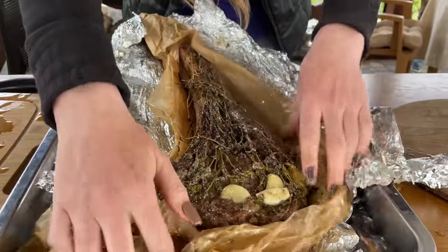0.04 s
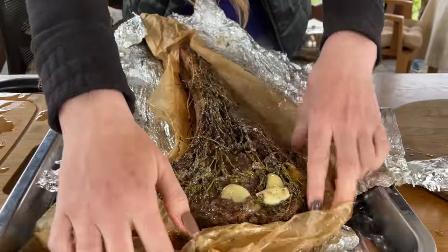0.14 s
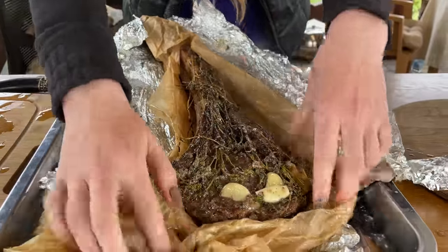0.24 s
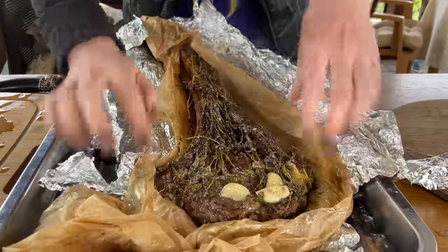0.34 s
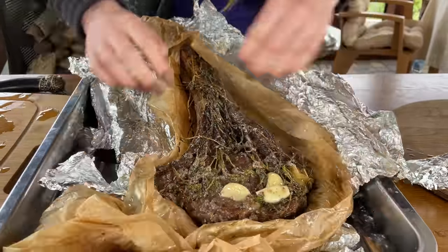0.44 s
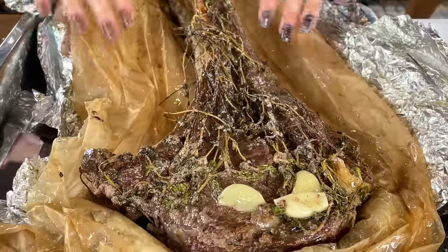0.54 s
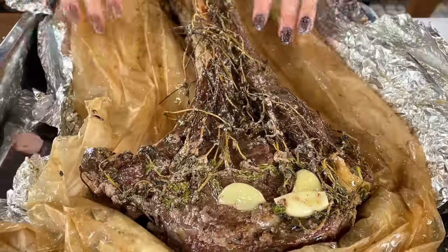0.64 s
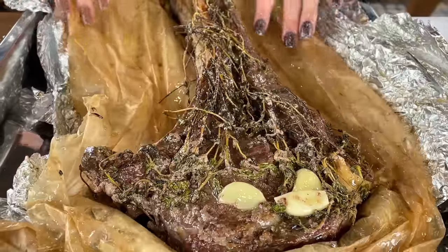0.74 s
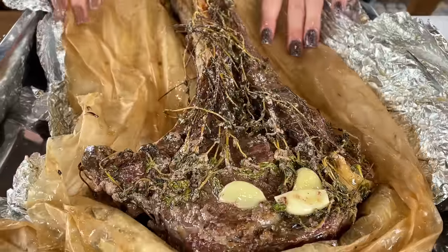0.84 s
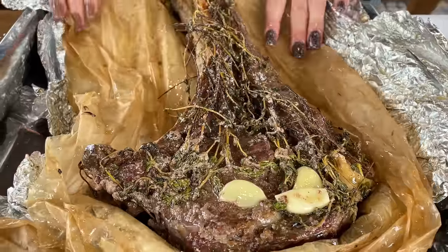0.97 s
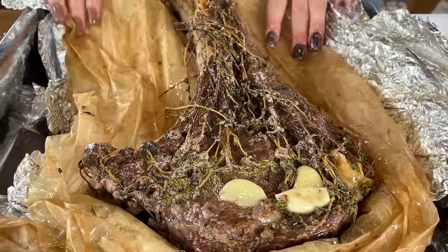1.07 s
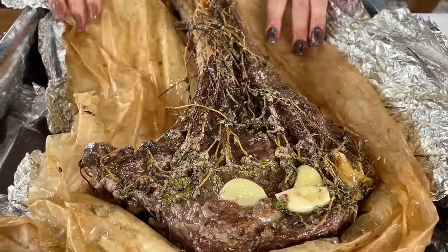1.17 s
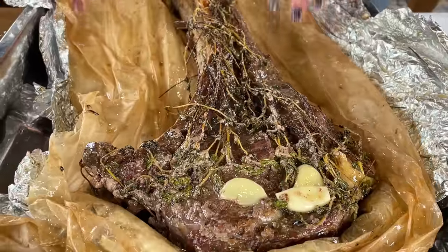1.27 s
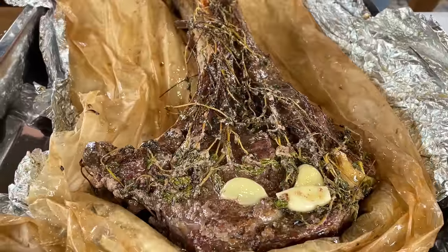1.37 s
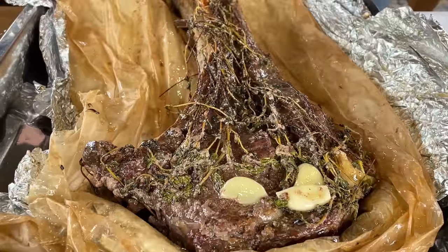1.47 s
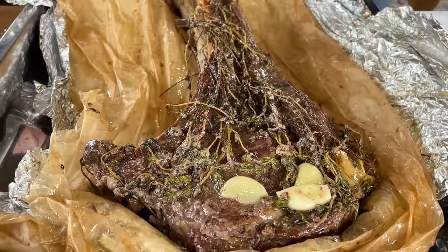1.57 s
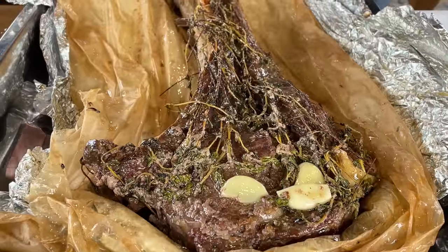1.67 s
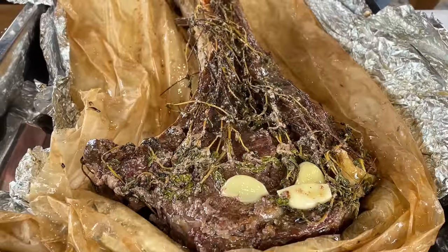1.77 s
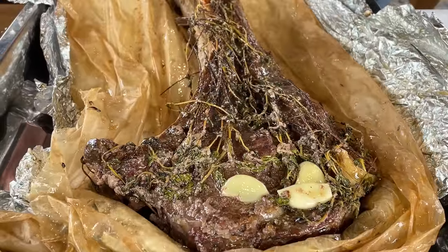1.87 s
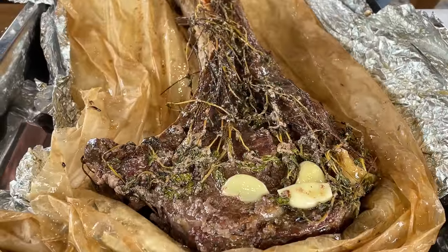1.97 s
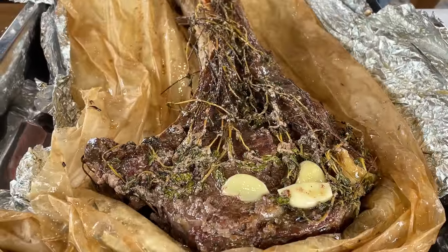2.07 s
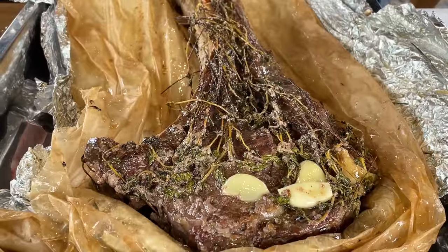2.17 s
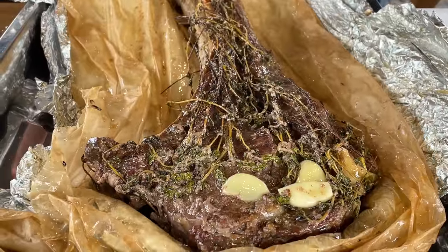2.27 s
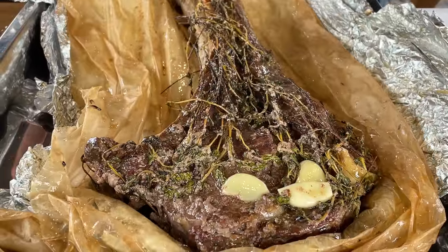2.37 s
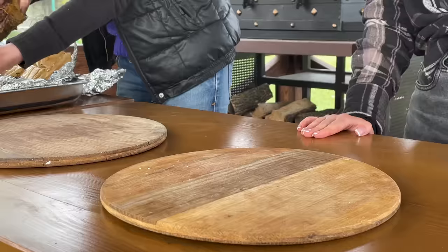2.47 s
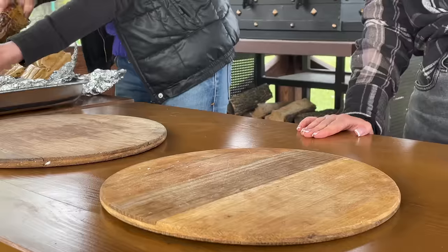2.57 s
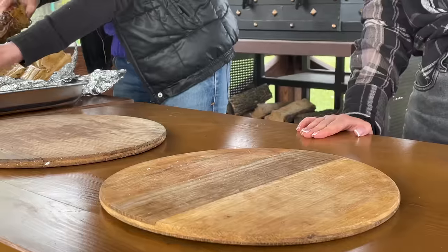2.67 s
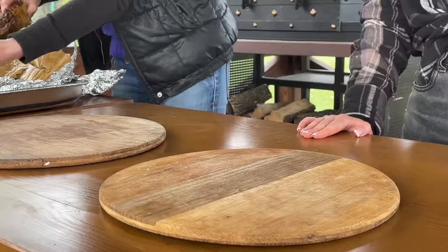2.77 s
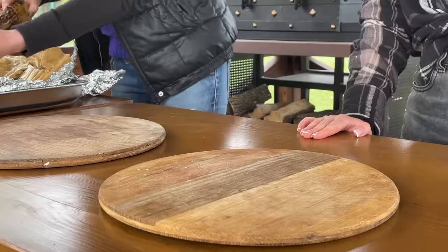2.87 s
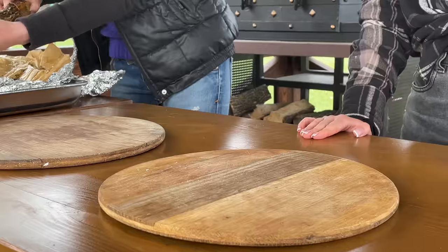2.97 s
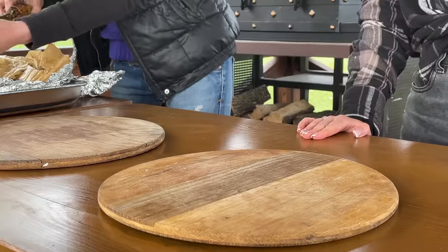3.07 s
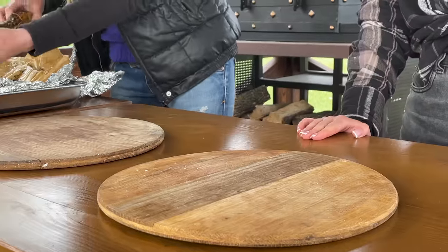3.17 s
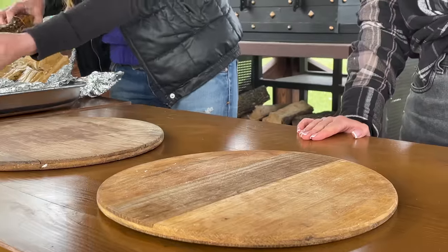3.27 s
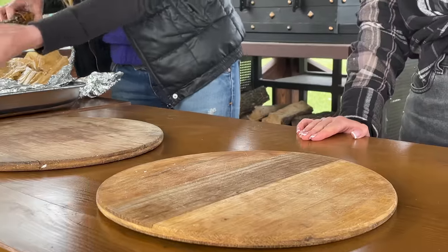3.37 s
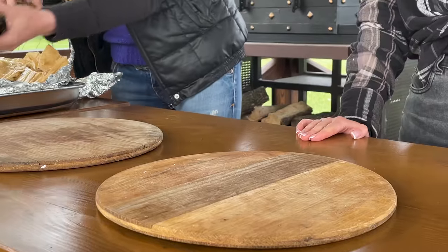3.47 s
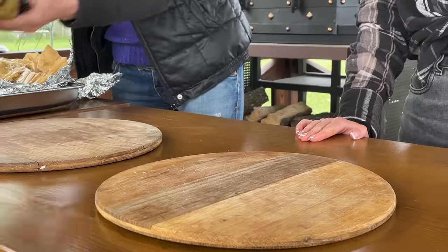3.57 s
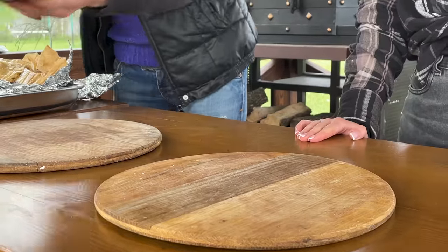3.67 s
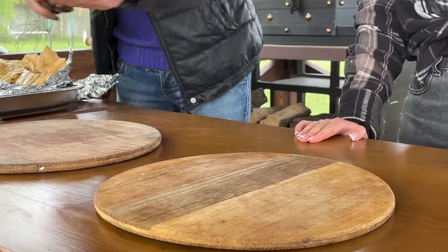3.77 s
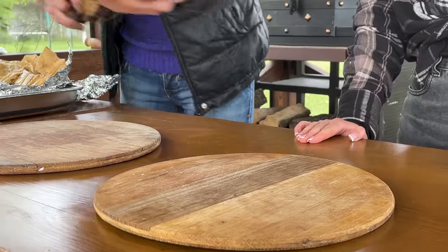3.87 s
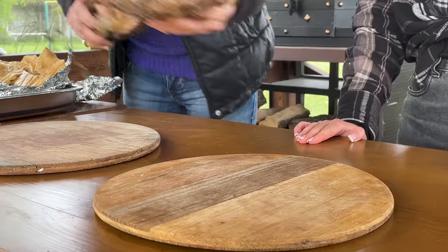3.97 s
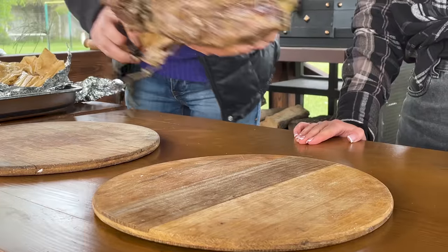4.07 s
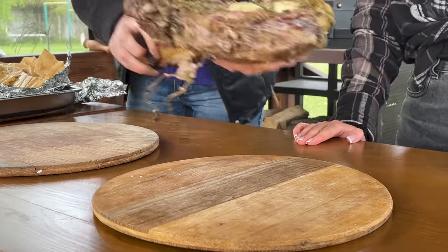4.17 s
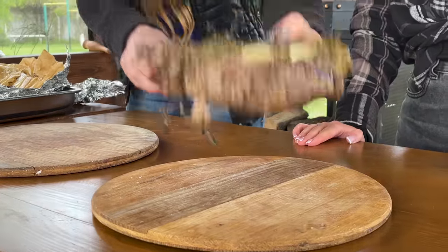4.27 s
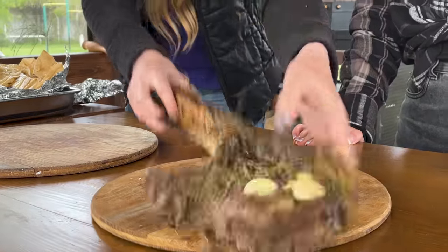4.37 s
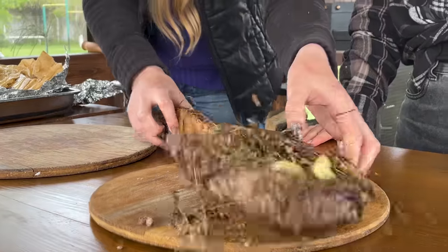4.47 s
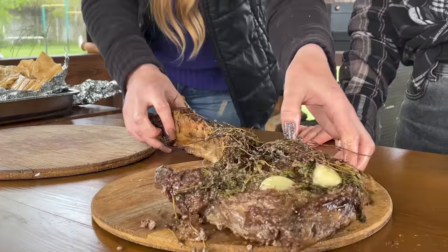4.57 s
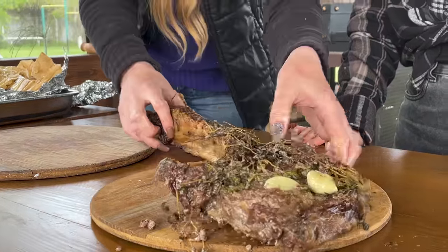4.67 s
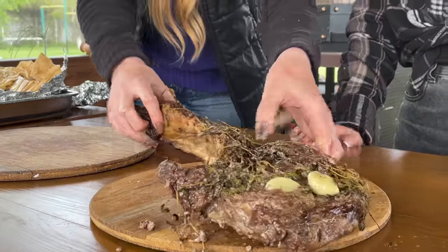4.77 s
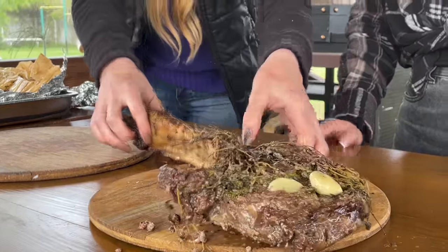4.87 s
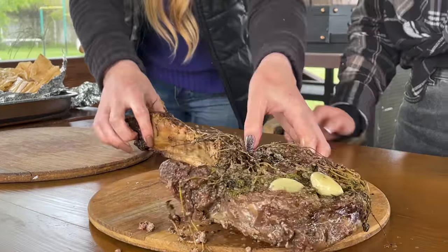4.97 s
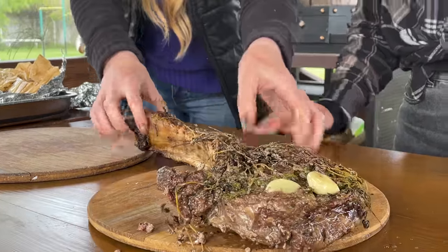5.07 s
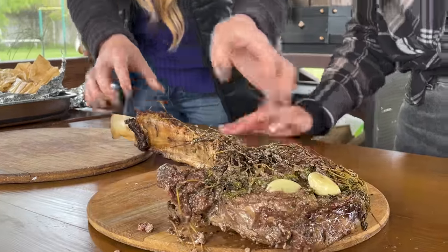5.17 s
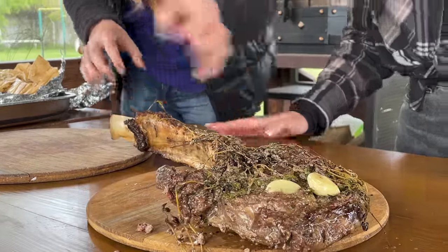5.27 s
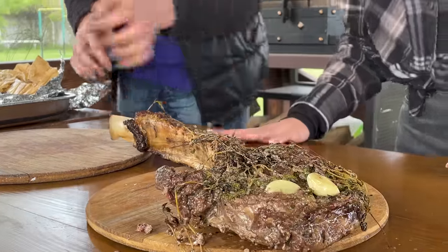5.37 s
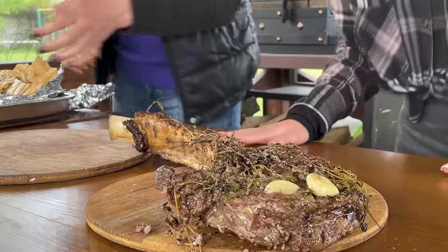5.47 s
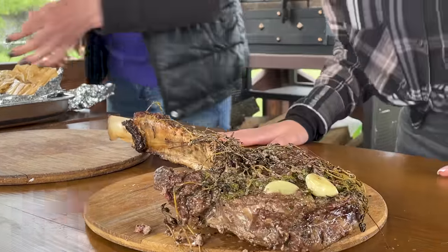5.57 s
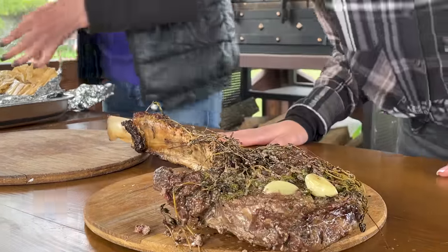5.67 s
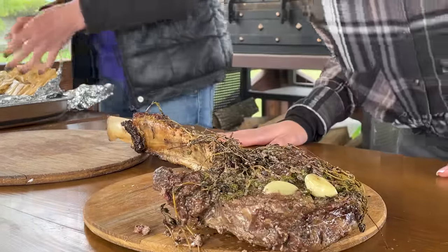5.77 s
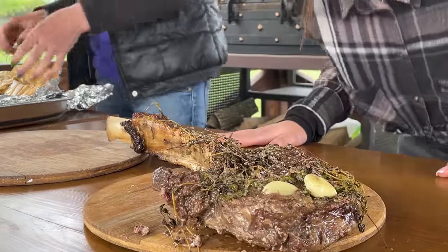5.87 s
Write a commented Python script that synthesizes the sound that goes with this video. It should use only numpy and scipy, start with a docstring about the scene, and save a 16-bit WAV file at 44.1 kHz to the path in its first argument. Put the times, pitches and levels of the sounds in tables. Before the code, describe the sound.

Crisp foil and greased paper crinkling up close, a quieter pause, a short tray scrape, then heavy meat landing bone first on wood.

```python
"""Over low rumble and hiss (filtered noise), hands pull foil and baking paper off a roast: random creases ring facets.
Fingers pat and slide (noise); a far whine (sagging sine) comes and goes; farther off foil stirs and knocks,
the sound blinks out once, and the roasting tray judders on the table (stick-slip driving damped modes).
The joint is carried over, dripping and shedding crumbs (ticks), lands bone first on a wooden board and is let
go with a thud (noise bursts, ringing modes); then sleeves rustle (noise). A small live room answers (noise tail)."""
import sys
import numpy as np
from scipy import signal
from scipy.fft import rfft, irfft
from scipy.io import wavfile
from scipy.ndimage import uniform_filter1d

SR = 44100
rng = np.random.default_rng(int(sys.argv[2]) if len(sys.argv) > 2 else 0)


def bounce(signal):
    """Save signal as a 16-bit WAV file at the path given by the first command-line argument."""
    frames = np.transpose(np.atleast_2d(signal))
    limited = np.clip(frames, -1, 1)
    pcm = np.round(limited * 32767).astype(np.int16)
    wavfile.write(sys.argv[1], SR, pcm)


N = 261513
TIME = np.arange(N) / SR   # s

# Rumble level. Each row: time in seconds, level in dB before RUMBLE_GAIN_DB.
RUMBLE_LEVEL = [(0.0, -64), (1.3, -61.5), (1.7, -63.5), (3.9, -60), (4.21, -68.5), (5.1, -58),
                (5.25, -60.5), (5.93, -62)]
# Background noise spectrum. Each row: frequency in Hz, relative level in dB.
AIR_SPECTRUM = [(12, -35.5), (20, 6), (40, -6.5), (70, -12), (104, -17.5), (130, -23.5), (154, -20.5),
                (182, -18), (457, -36), (755, -40.5), (868, -42.5), (2060, -46), (2730, -46.5), (3410, -50),
                (15800, -55)]
RUMBLE_GAIN_DB, HISS_DB = 4.5, -71.5

# Pulls on the wrapping: it swells as the sheets tighten, then lets go. Each row: start in seconds,
# length in seconds, swell in dB, 60 dB release in seconds, foil level in dB, paper level in dB.
PULLS = [(-.02, 0.37, -2, 0.055, -57, -55), (0.317, .075, 8, 0.046, -55.5, -56.5),
         (0.773, .19, 12, 0.41, -55.5, -53.5), (1.066, 0.079, 10.5, 0.19, -57.5, -53.5),
         (1.246, 0.1, 9.5, 0.24, -55.5, -58.5)]
# Foil spectrum. Each row: frequency in Hz, relative level in dB.
FOIL_SPECTRUM = [(700, -31), (1600, 3), (2400, 6.5), (2900, -0.5), (4500, 6), (6500, 3.5), (7500, 0.5),
                 (10000, 2.5), (12500, -4.5), (14500, -26), (16000, -17)]
# Baking paper spectrum. Each row: frequency in Hz, relative level in dB.
PAPER_SPECTRUM = [(80, -11), (150, -3), (380, -1), (580, 0.5), (1000, 3), (1700, -6), (2800, -3),
                  (6000, -7)]
SETTLE_DB, SETTLE_S = -14.5, 1   # let go, the sheets creak on faintly
ATTACK_S = 0.007   # a movement sets in this fast
FOIL_RUB = 0.45   # sheet friction relative to crease snaps
CATCH_DB, CATCHES_PER_S = 1.3, 60   # folds catch and give: rms wander of the crackle, and its rate
# Small snaps: peak above the foil level, spread either way (0 = all alike), middle pitch.
STRAY_SNAPS_PER_S, STRAY_SNAP_DB, STRAY_SPREAD_DB, STRAY_HZ = 46, 16, 0, 7040
# Fingers patting the wrapping. Each row: time in seconds, peak in dB, softness low-pass in Hz.
PATS = [(0.081, -41, 537), (0.331, -34, 1880), (.337, -35.5, 2050)]
# Loudest crease snaps. Each row: time in seconds, peak in dB, centre in Hz.
LOUD_SNAPS = [(.1456, -30, 9100), (.1699, -32, 9000), (.2044, -32, 6000), (.2209, -32.5, 3000),
              (.2779, -30.5, 4430), (.3090, -25, 3830), (.5449, -47.5, 5860), (.7676, -43.5, 5010),
              (.7983, -40, 4540), (.8395, -38.5, 8000), (.8937, -29.5, 4300), (.9543, -36, 5000),
              (.9709, -27.5, 8500), (1.0851, -34.5, 4470), (1.1082, -37, 9000), (1.1335, -29, 3360),
              (1.2731, -39, 6660), (1.3341, -31, 8000)]
# Slides of fingers, wrapping and sleeves. Each row: middle in seconds, half length in seconds,
# level in dB before a 6 dB cut, centre in Hz, width in octaves.
SLIDES = [(0.359, 0.043, -40.5, 9900, 2.2), (0.943, 0.018, -44.5, 5130, 1.7),
          (0.986, 0.041, -49, 8800, 0.57), (1.136, 0.0072, -43.5, 4000, 7.1),
          (1.352, 0.024, -39, 7170, 0.73), (1.59, 0.056, -64.5, 1690, 2), (2.576, 0.051, -57.5, 680, 0.98),
          (3.506, 0.03, -55, 6900, 1.1), (4.052, 0.054, -65, 6400, 3.8), (5.205, 0.028, -62, 4220, 0.38),
          (5.268, 0.03, -57, 4070, 0.81), (5.49, 0.017, -54.5, 4530, 1.7), (5.52, 0.056, -64, 1440, 2.2),
          (5.84, 0.042, -62.5, 4280, 2.5)]

# Far whine. Each row: loudest time in seconds, half length in seconds, pitch there in Hz, level in dB.
WHINES = [(2.95, 0.53, 480, -75), (3.68, 0.27, 464, -81.5), (5.6, .14, 460, -79)]
SAG_HZ_PER_S = 43

# Far foil stirring. Each row: start in seconds, length in seconds, swell in dB,
# 60 dB release in seconds, level in dB.
FOIL_STIRS = [(2.53, .04, 9, 0.34, -66.5), (2.607, 0.11, -0.5, 0.28, -62.5), (2.773, .02, -4, .17, -58),
              (3.49, .03, 6, .4, -67)]
# Far foil spectrum. Each row: frequency in Hz, relative level in dB.
FAR_FOIL_SPECTRUM = [(180, -35), (300, -15.5), (474, -12), (763, -13), (913, -7), (1620, -11.5), (2100, -3),
                     (3860, -19), (4120, -13), (8320, -15), (10800, -17.5), (15000, -21)]
# Wrapping knocking in the tray. Each row: time in seconds, peak in dB, centre in Hz.
CLACKS = [(2.564, -52, 900), (2.6185, -43.5, 2030), (2.6276, -47, 2350), (2.692, -47, 3580),
          (2.7828, -40.5, 2080), (2.792, -55, 2100)]
# Blink of silence: from seconds, to seconds.
SILENCE_S = (2.503, 2.521)
# Juice drops and herb crumbs landing. Each row: time in seconds, peak in dB, centre in Hz.
DRIPS = [(3.212, -53.5, 9000), (4.154, -52, 10200), (4.1862, -39, 7000), (4.2048, -54, 7150),
         (4.3159, -52.5, 5000), (4.3281, -47, 5240), (4.346, -56, 4000), (4.6274, -51, 9100),
         (4.9714, -49, 2150), (4.985, -46, 5970), (5.494, -44, 3740)]

# Tray modes. Each row: frequency in Hz, relative level in dB, 60 dB decay in seconds.
TRAY_MODES = [(167, -1, 0.16), (228, -17, 0.24), (339, 8, 0.03), (376, -12.5, 0.11), (396, -7, 0.14),
              (436, -6, 0.09), (623, 2.5, 0.057), (678, 4.5, 0.12), (710, 5.5, 0.05), (963, -4, 0.27),
              (1040, -5, 0.071), (1088, -2, 0.093), (1160, -1.5, 0.15), (1560, 2.5, 0.014),
              (1720, -17, 0.15), (1725, -17, 0.18), (1880, -16, .06), (2430, -13.5, 0.043),
              (3000, -18, .025), (3520, -42, .03), (4570, -9.5, 0.026), (5000, -10, 0.017),
              (5860, -25, .015), (9150, -16, 0.024)]
# Dull bumps as the tray breaks loose and stops. Each row: time in seconds, peak in dB, upper cut in Hz.
SHOVES = [(3.3233, -47, 400), (3.342, -32, 415), (3.432, -41.5, 400)]
JUDDER_START_S, JUDDER_S = 3.332, 0.105   # until the foot holds again
FIRST_SLIPS_PER_S, TOP_SLIPS_PER_S, SPEED_UP_S = 130, 240, 0.016   # speed-up time constant
# Drive levels, before the tray and table gains.
PUSH_DB, PUSH_S, PUSH_RELEASE_S = -35, 0.032, 0.12   # dull push of the first slips
RASP_DB, RASP_S, RASP_SWELL_DB, RASP_RELEASE_S = -39.5, 0.033, 14, 0.36   # sharp edge of the slips

# Herb crumbs trickling off the carried joint; level and pitch are midpoints.
CRUMBS_START_S, CRUMBS_S, CRUMBS_PER_S, CRUMB_DB, CRUMB_HZ = 4.03, 0.44, 38, -58, 8000

# Bone meeting the board. Each row: time in seconds, then drive levels before fixed gains: wood in dB, contact
# low-pass in Hz, grit in dB, sharp crack in dB, board ring in dB, table ring in dB.
BONE_KNOCKS = [(4.4790, -25, 9000, -16, -18, -59, -48), (4.4834, -22.5, 8000, -16, -3, -59, -31),
               (4.4956, -20, 5000, -32.5, -23.5, -62, -44.5), (4.523, -22, 3500, -46, -27, -58, -55),
               (4.5390, -26.5, 2200, -53.5, -36, -42, -39)]
# Meat settling on the board. Each row: time in seconds, slap in dB before a fixed gain,
# softness low-pass in Hz, board ring drive in dB, table ring drive in dB.
MEAT_THUDS = [(4.984, -34, 2500, -56, -46), (4.9951, -15.5, 4500, -36.5, -45),
              (5.0310, -28.5, 1820, -37, -38)]
# Crowded short wood modes, as a spectrum. Each row: frequency in Hz, relative level in dB.
WOOD_SPECTRUM = [(60, -17), (200, -3.5), (300, -10), (400, -7), (530, -9), (750, -6), (930, -12),
                 (1140, -9), (1350, -14.5), (1720, -6), (2080, -11), (2500, -18), (3200, -21.5),
                 (3800, -17), (5200, -15.5), (15000, -40)]
# Bone crack spectrum. Each row: frequency in Hz, relative level in dB.
CRACK_SPECTRUM = [(400, -21), (900, -17), (1750, -5.5), (2500, -8.5), (3000, 0.5), (3300, 3.5), (3650, -2),
                  (4100, -4.5), (5800, -4), (7000, -9.5), (8700, -8.5), (13000, -15), (16000, -26)]
# Flesh slap spectrum. Each row: frequency in Hz, relative level in dB.
SLAP_SPECTRUM = [(70, -25.5), (200, -1), (450, -0.5), (650, 2.5), (1150, -1), (1480, -0.5), (1650, -12.5),
                 (2050, -8), (2600, -15), (3500, -19.5), (6000, -26), (12000, -22.5)]
# Bone modes. Each row: frequency in Hz, relative level in dB, 60 dB decay in seconds.
BONE_MODES = [(1570, -7, .06), (2087, -2, 0.041), (3180, -8, .07), (5700, -9.5, .012)]
# Round board modes. Each row: frequency in Hz, relative level in dB, 60 dB decay in seconds.
BOARD_MODES = [(236.6, 8.5, 0.21), (266.4, -5.5, 0.27), (374, -11, 0.16), (400, -8, 0.15),
               (502, -11.5, .15), (612, -17, 0.23), (714, -9, 0.2), (781, -12.5, 0.16), (1158, -14, 0.25),
               (1260, -17, 0.21), (1385, -18, 0.2), (1700, -25, 0.22), (1770, -18, 0.17), (1935, -17, 0.15)]
# Modes of the table under it. Each row: frequency in Hz, relative level in dB, 60 dB decay in seconds.
TABLE_MODES = [(69.2, -3.5, 0.12), (100, -21.5, .25), (114.8, -9, 0.41), (131.9, -4, 0.28),
               (173.1, -5, 0.47)]
CLOTHES_START_S, CLOTHES_DB = 4.98, -74.5

# Room decay. Each row: frequency in Hz, 60 dB decay in seconds.
ROOM_DECAY = [(200, 0.47), (500, 0.38), (1000, 0.46), (2500, 0.45), (6000, 0.24), (14000, 0.18)]
CUTOFF_HZ = 15650


def from_db(db):
    """Amplitude ratio of a level in dB."""
    return 10 ** (np.asarray(db) / 20)


def rms_one(x):
    """Scale to rms 1."""
    return x / np.sqrt(np.mean(x ** 2) + 1e-20)


def peak_one(x):
    """Scale to peak 1."""
    return x / np.max(np.abs(x))


def at_hz(points, hz):
    """Read a curve over log frequency."""
    point_hz, value = np.array(points)[:, :2].T
    return np.interp(np.log(hz + 1), np.log(point_hz), value)


def cut(x, hz, kind, order=2):
    """Butterworth low-, high- or band-pass."""
    sos = signal.butter(order, np.clip(hz, 10, 0.45 * SR), kind, fs=SR, output="sos")
    return signal.sosfilt(sos, x + 1e-18)


def colour(x, spectrum, size=8192):
    """Causal (minimum-phase) filter of unit energy with the given spectrum."""
    bins_hz = np.arange(size // 2 + 1) * SR / size
    cepstrum = irfft(np.log(from_db(at_hz(spectrum, bins_hz))))
    cepstrum[1:size // 2] *= 2   # fold onto positive time
    cepstrum[size // 2 + 1:] = 0
    response = irfft(np.exp(rfft(cepstrum)))
    return signal.fftconvolve(x, response / np.linalg.norm(response))[:len(x)]


def drift(knots_per_s):
    """Random wander of rms 1, linear between random knots."""
    knots = rng.standard_normal(4096)
    return rms_one(np.interp(TIME * knots_per_s, np.arange(len(knots)), knots))


def ring(force, modes):
    """Parallel damped modes driven by a force, signs alternating."""
    out = 0
    for k, (hz, db, t60_s) in enumerate(modes):
        r = from_db(-60 / (t60_s * SR))
        w = 2 * np.pi * hz / SR
        mode = signal.lfilter([0, np.sin(w)], [1, -2 * r * np.cos(w), r * r], force + 1e-18)
        out = out + (-1) ** k * from_db(db) * mode
    return out


def burst(t60_s, size=32768):
    """Noise that starts at once and dies away exponentially."""
    return rng.standard_normal(size) * np.exp(-np.log(1000) * np.arange(size) / SR / t60_s)


def add(track, start_s, sound):
    """Mix a sound into a track at a time."""
    at = max(round(start_s * SR), 0)
    track[at:at + len(sound)] += sound[:N - at]


def stroke(start_s, length_s, swell_db, release_s):
    """Envelope of one movement: quick attack, swell up to 1 at its end, then release at 60 dB per release_s."""
    age = TIME - start_s
    to_go = np.clip(1 - age / length_s, 0, 1)
    released = np.clip((age - length_s) / release_s, 0, 3)
    return np.clip(age / ATTACK_S, 0, 1) * from_db(-swell_db * to_go) * 0.001 ** released


def swell(middle_s, half_length_s):
    """Bell-shaped rise and fall around a time."""
    return np.exp(-2 * ((TIME - middle_s) / half_length_s) ** 2)


def ticks(rows, t60_s, flutter_db, width):
    """Each tick is a sharp click and a brief noise flutter, band-passed around its own pitch."""
    out = np.zeros(N)
    for s, db, hz in rows:
        click = from_db(flutter_db) * burst(t60_s, size=4096)
        click[0] = 1
        band = cut(click, [hz / (1 + width), hz * (1 + width)], "band", order=1)
        add(out, s, from_db(db) * peak_one(band))
    return out


def crinkle(per_s, spread_db, cycles, rub, facets=20):
    """Tiny creases buckle at random, each ringing a facet of its own size, over the hiss of sheets rubbing; rms 1."""
    sizes = from_db(spread_db * np.minimum(rng.exponential(1, N), 4)) * rng.choice([-1, 1], N)
    clicks = sizes * (rng.random(N) < per_s * from_db(3 * drift(120)) / SR)
    facet = rng.integers(0, facets, N)
    snaps = 0
    for k, hz in enumerate(np.geomspace(400, 15000, facets)):
        strain = from_db(3.06 * drift(35))   # the fold wanders from facet to facet
        snaps = snaps + hz * ring(clicks * (facet == k) * strain, [(hz, 0, cycles / hz)])
    return rms_one(rms_one(snaps) + rub * rng.standard_normal(N))


def rumble_and_hiss():
    """One shaped noise, split into a low rumble of varying level and a steady soft hiss."""
    level_s, level_db = np.transpose(RUMBLE_LEVEL)
    rumble_db = np.interp(TIME, level_s, level_db) + RUMBLE_GAIN_DB
    air = colour(rng.standard_normal(N + SR), AIR_SPECTRUM)[SR:]   # skip the filter's onset
    rumble = from_db(rumble_db) * rms_one(cut(air, 219, "low"))
    hiss = from_db(HISS_DB) * rms_one(cut(air, 397, "high"))
    return rumble + hiss


def wrapping():
    """Creases crackle brightly in the foil and rustle in the baking paper under it, as hard as each is pulled."""
    foil_level = paper_level = np.zeros(N)
    for start_s, length_s, swell_db, release_s, foil_db, paper_db in PULLS:
        pull = stroke(start_s, length_s, swell_db, release_s)
        settling = from_db(SETTLE_DB) * stroke(start_s, length_s, swell_db, SETTLE_S)
        effort = np.maximum(pull, settling)
        foil_level = np.maximum(foil_level, from_db(foil_db) * effort)
        paper_level = np.maximum(paper_level, from_db(paper_db) * effort)
    catches = from_db(CATCH_DB * drift(CATCHES_PER_S))   # gathers the crackle in clusters
    foil = rms_one(colour(crinkle(per_s=3000, spread_db=0.5, cycles=7.1, rub=FOIL_RUB), FOIL_SPECTRUM))
    paper = rms_one(colour(crinkle(per_s=2200, spread_db=2.5, cycles=5, rub=0.4), PAPER_SPECTRUM))
    return foil_level * catches * foil + paper_level * paper + stray_snaps(foil_level)


def stray_snaps(foil_level):
    """Small snaps come at random over an octave, as strong as the foil is being worked."""
    rows = []
    for at, size, pitch in rng.random((int(STRAY_SNAPS_PER_S * N / SR), 3)):
        foil_db = 20 * np.log10(foil_level[int(at * N)] + 1e-9)
        peak_db = foil_db + STRAY_SNAP_DB + STRAY_SPREAD_DB * (2 * size - 1)
        rows.append((at * N / SR, peak_db, STRAY_HZ * 2 ** (pitch - 0.5)))
    return ticks(rows, t60_s=0.015, flutter_db=-15, width=0.59)


def pats():
    """Fingers pat the wrapping with soft noise bursts; their weight also rings the table."""
    out, weight = np.zeros((2, N))
    for s, db, cut_hz in PATS:
        soft = cut(burst(0.036), cut_hz, "low")
        add(out, s, from_db(db) * peak_one(cut(soft, 60, "high")))
        add(weight, s, from_db([db]))
    return out + from_db(-24.0) * ring(weight, TABLE_MODES)


def loud_snaps():
    """The loudest creases snap through as bright ticks."""
    return ticks(LOUD_SNAPS, t60_s=0.021, flutter_db=-19.5, width=0.68)


def slides():
    """Grainy friction, band-passed, swells and fades with each stroke."""
    out = np.zeros(N)
    grain = crinkle(per_s=7600, spread_db=5, cycles=3.2, rub=0.86)
    for s, half_length_s, db, hz, octaves in SLIDES:
        half_band = 2 ** (octaves / 2)
        band = rms_one(cut(grain, [hz / half_band, hz * half_band], "band"))
        out += from_db(db - 6) * band * swell(s, half_length_s)
    return out


def whine():
    """A far sine comes and goes, sagging in pitch and wavering slightly."""
    out = 0
    for s, half_length_s, hz, db in WHINES:
        pitch_hz = hz - SAG_HZ_PER_S * (TIME - s) + 4 * drift(22.93)
        level = from_db(db + 2 * drift(14)) * swell(s, half_length_s)
        out = out + level * np.sin(2 * np.pi * np.cumsum(pitch_hz) / SR)
    return out


def far_foil():
    """The wrapping shifts in the tray as the joint is gripped: sparser creases, duller."""
    level = np.zeros(N)
    for start_s, length_s, swell_db, release_s, db in FOIL_STIRS:
        level = np.maximum(level, from_db(db) * stroke(start_s, length_s, swell_db, release_s))
    return level * rms_one(colour(crinkle(per_s=1000, spread_db=4.5, cycles=5.3, rub=1.0), FAR_FOIL_SPECTRUM))


def clacks():
    """The wrapping knocks in the tray as narrow-band ticks."""
    return ticks(CLACKS, t60_s=0.03, flutter_db=-10, width=0.22)


def drips():
    """Juice drops and herb crumbs land as small ticks."""
    return ticks(DRIPS, t60_s=0.016, flutter_db=-14.5, width=0.3)


def tray():
    """Uneven slips of the tray's foot, dull then sharp, drive its modes, which ring on when it stops."""
    age = np.maximum(TIME - JUDDER_START_S, 0)
    sliding = (age > 0) & (age < JUDDER_S)
    slips_per_s = TOP_SLIPS_PER_S + (FIRST_SLIPS_PER_S - TOP_SLIPS_PER_S) * np.exp(-age / SPEED_UP_S)
    slip_count = np.cumsum(sliding * slips_per_s * from_db(0.8 * drift(170))) / SR
    slips = np.diff(np.floor(slip_count), prepend=0) * from_db(2 * drift(200))
    push_level = from_db(PUSH_DB) * stroke(JUDDER_START_S, PUSH_S, 0, PUSH_RELEASE_S)
    push = cut(slips * push_level, 520, "low")
    rasp_level = from_db(RASP_DB) * stroke(JUDDER_START_S, RASP_S, RASP_SWELL_DB, RASP_RELEASE_S)
    rasp = (slips + 0.1 * rng.standard_normal(N) * sliding) * rasp_level
    shove = np.zeros(N)
    for s, db, cut_hz in SHOVES:
        bump = cut(signal.unit_impulse(2048), [cut_hz / 2, cut_hz], "band")
        add(shove, s, from_db(db) * peak_one(bump))
    ringing = from_db(-13) * ring(push + rasp, TRAY_MODES) + from_db(-22) * ring(push, TABLE_MODES)
    return ringing + from_db(6.0) * cut(rasp, [250, 10000], "band", order=1) + shove


def crumbs():
    """A random trickle of tiny ticks, spread over 10 dB and an octave."""
    rows = []
    for at, size, pitch in rng.random((int(CRUMBS_PER_S * CRUMBS_S), 3)):
        s = CRUMBS_START_S + at * CRUMBS_S
        rows.append((s, CRUMB_DB + 10 * (size - 0.5), CRUMB_HZ * 2 ** (pitch - 0.5)))
    return ticks(rows, t60_s=0.016, flutter_db=-16, width=0.4)


def joint_on_board():
    """Bone cracks on the wood, flesh lands with a soft slap; board and table ring with each blow."""
    wood, grit, crack, slap, board, table = np.zeros((6, N))
    hard_tap = cut(signal.unit_impulse(512), 402, "high")   # barely moves the board's lowest modes
    for s, wood_db, cut_hz, grit_db, crack_db, board_db, table_db in BONE_KNOCKS:
        add(wood, s, from_db(wood_db - 9.5) * cut(burst(0.13), cut_hz, "low"))
        add(grit, s, from_db(grit_db - 8.0) * burst(0.029))
        add(crack, s, from_db([crack_db]))
        add(board, s, from_db(board_db + 3.5) * hard_tap)
        add(table, s, from_db([table_db]))
    for s, slap_db, cut_hz, board_db, table_db in MEAT_THUDS:
        add(slap, s, from_db(slap_db - 16.5) * cut(burst(0.2), cut_hz, "low"))
        add(board, s, from_db([board_db]))
        add(table, s, from_db([table_db]))
    bone = colour(grit + crack, CRACK_SPECTRUM) + from_db(-32.0) * ring(crack, BONE_MODES)
    contact = cut(colour(wood, WOOD_SPECTRUM), 230, "high") + colour(slap, SLAP_SPECTRUM)
    return bone + contact, ring(board, BOARD_MODES) + ring(table, TABLE_MODES)


def clothes():
    """Sleeves keep rustling as the two people move: steady band-passed noise."""
    rustle = rms_one(cut(rng.standard_normal(N), [300, 5000], "band", order=1))
    return from_db(CLOTHES_DB) * (TIME > CLOTHES_START_S) * rustle


def room(x):
    """Reverberation of unit energy: noise dying band by band, after the first wall's delay."""
    edges_hz = np.geomspace(200, 18000, 12)
    tail = 0
    for low_hz, high_hz in zip(edges_hz, edges_hz[1:]):
        t60_s = at_hz(ROOM_DECAY, np.sqrt(low_hz * high_hz))
        tail = tail + cut(burst(t60_s), [low_hz, high_hz], "band")
    tail *= np.clip(np.arange(len(tail)) / SR / 0.0048 - 1, 0, 1)   # silent 4.8 ms, then fades in over 4.8 ms
    return signal.fftconvolve(x, tail / np.linalg.norm(tail))[:N]


def scene():
    """Near wrapping, farther tray and drips, and the joint on the board share one room."""
    near = wrapping() + pats() + slides() + loud_snaps()
    far = clacks() + far_foil() + tray() + crumbs() + drips()
    knocks, ringing = joint_on_board()
    wet = from_db(-14.0) * near + from_db(-6.5) * far + from_db(-13) * knocks + from_db(-17.5) * ringing
    indoors = near + far + knocks + ringing + room(wet)
    background = rumble_and_hiss() + clothes() + whine()   # stays out of the room tail
    return (indoors + background)[None]


def record(dry):
    """The sound blinks out once; the microphone rounds off the top, then it is cut steeply."""
    is_open = (TIME < SILENCE_S[0]) | (TIME > SILENCE_S[1])
    gate = uniform_filter1d(1.0 * is_open, size=128)   # softens the edges
    heard = cut(dry * gate, 14800, "low")
    steep = signal.ellip(10, 0.1, 80, CUTOFF_HZ, fs=SR, output="sos")
    return signal.sosfilt(steep, heard)


dry = scene()
out = record(dry)
bounce(out)
```